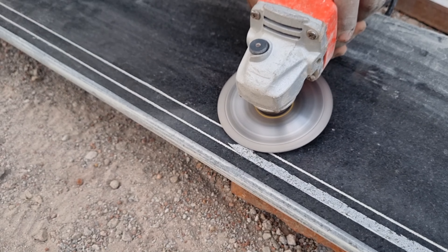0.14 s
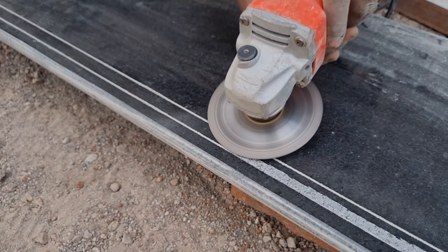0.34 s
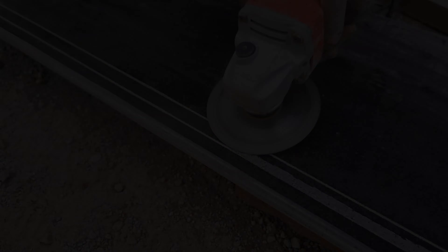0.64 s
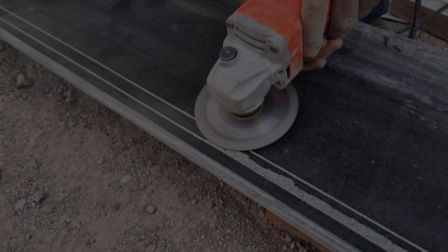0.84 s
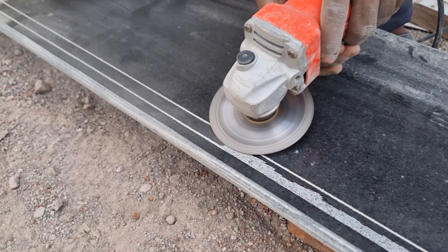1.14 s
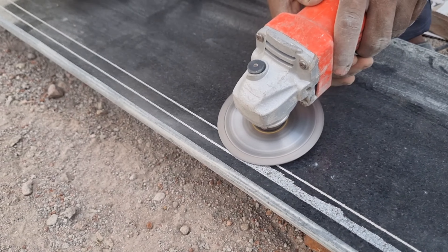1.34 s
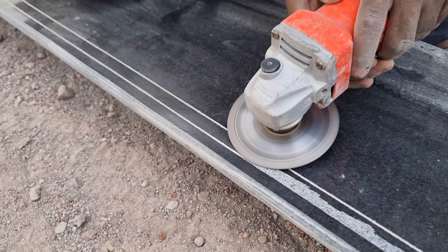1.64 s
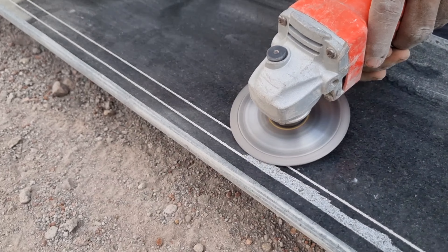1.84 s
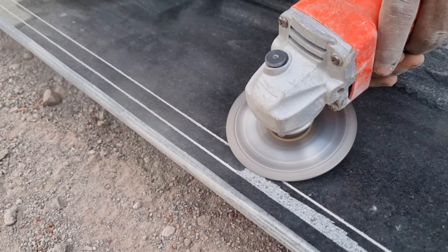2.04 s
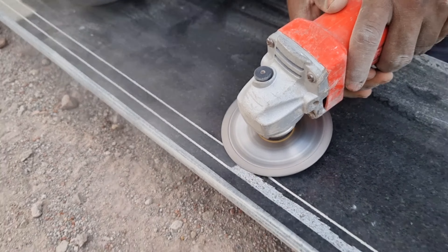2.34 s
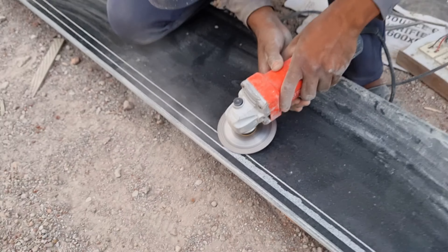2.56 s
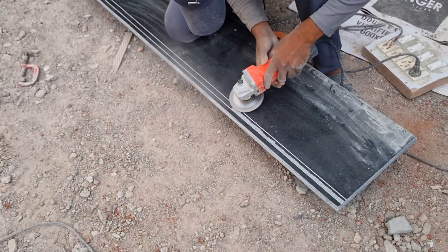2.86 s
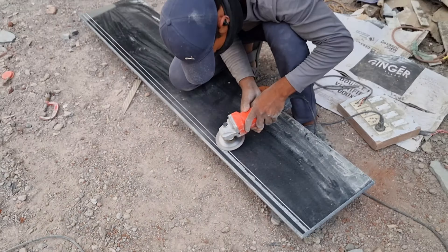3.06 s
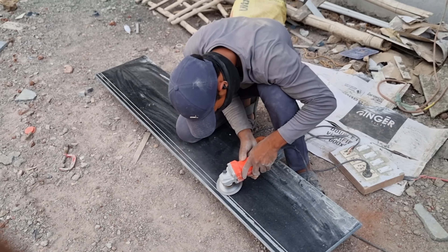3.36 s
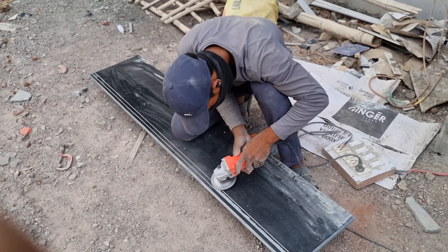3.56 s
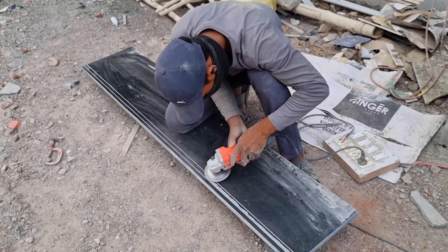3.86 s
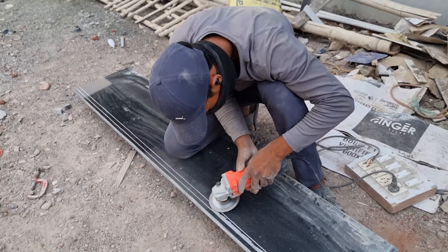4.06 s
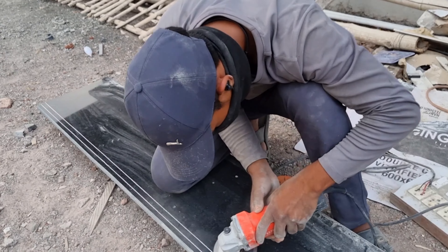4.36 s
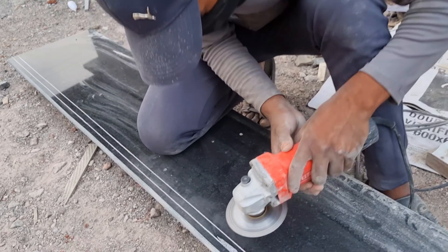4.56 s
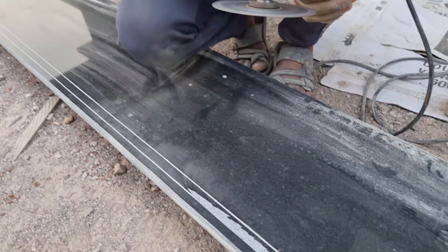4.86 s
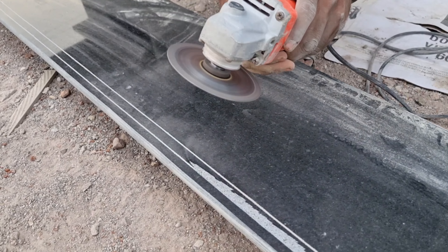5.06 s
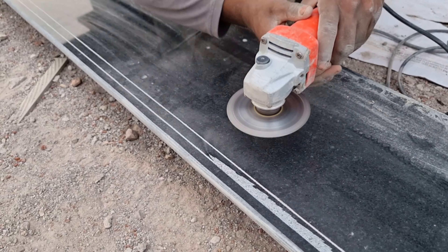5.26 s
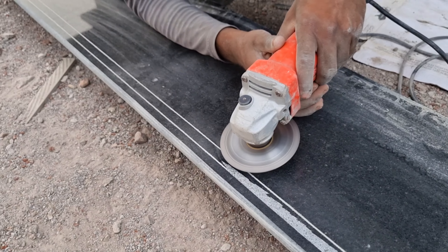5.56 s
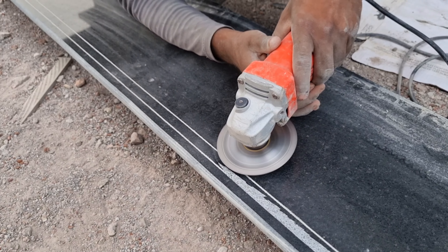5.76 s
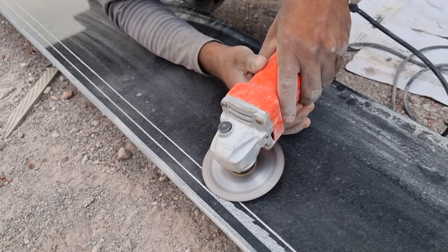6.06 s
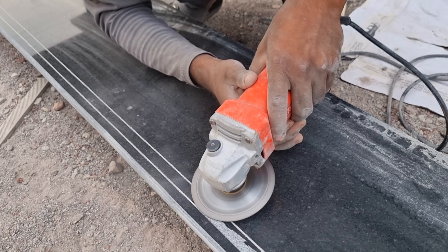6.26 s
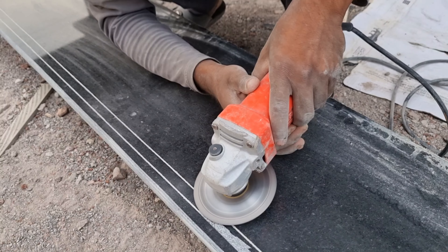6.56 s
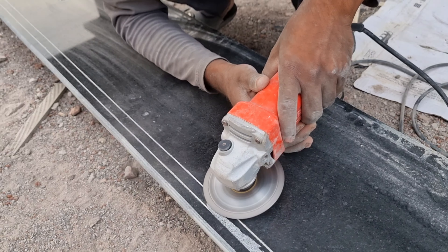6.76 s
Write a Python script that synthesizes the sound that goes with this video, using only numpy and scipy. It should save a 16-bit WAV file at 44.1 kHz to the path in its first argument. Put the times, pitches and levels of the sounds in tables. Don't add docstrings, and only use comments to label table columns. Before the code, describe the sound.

An angle grinder roars harsh and gritty on a stone slab outdoors, its disc ringing metallically, lifting off into free-running whine while wind thumps the microphone.

```python
import sys
import numpy as np
from scipy import signal
from scipy.fft import rfft, irfft, next_fast_len
from scipy.io import wavfile
from scipy.ndimage import uniform_filter1d

SR = 44100
rng = np.random.default_rng(int(sys.argv[2]) if len(sys.argv) > 2 else 0)


def master_out(mix):
    frames = np.transpose(np.atleast_2d(mix))
    ceiling = np.clip(frames, -1, 1)
    pcm = np.round(ceiling * 32767).astype(np.int16)
    wavfile.write(sys.argv[1], SR, pcm)


def to_linear_factor(level_db):
    exponent = np.asarray(level_db, float) / 20
    return 10 ** exponent


N = 304731

# [t/s, speed/turns per s]
SPINDLE_SPEED = [(0, 187), (.6, 186), (1, 184), (2.5, 183), (4.2, 182), (4.5, 184), (4.9, 188), (5.4, 191),
                 (6, 191), (6.91, 188)]
# [t/s, loudness/dB, treble of the disc face/dB, pressure on stone/dB]
TOOL_LEVELS = [(0, -25.5, 6.5, 3.5), (.35, -24.5, 3, -1.5), (.7, -25, -1, 1.5), (1.05, -25, 0.5, 3.5),
               (1.4, -23.5, -2, 0.5), (1.75, -23.5, -2, 0), (2.1, -24, 1, 2.5), (2.72, -26, 1.5, 2.5),
               (2.9, -28.5, 8.5, 2.5), (3.2, -29.5, 6.5, 4.5), (3.45, -29, 9.5, 5), (3.9, -31, 5, 7),
               (4.18, -29.5, 12, 1), (4.3, -31.5, 12, 1.5), (4.42, -30.5, 5.5, -7), (4.5, -31, 2.5, 0),
               (4.8, -27.5, 4, -7), (5.05, -22.5, -8, -1), (5.2, -23.5, 1, 7), (5.75, -24, 1.5, -2),
               (6.05, -20.5, 2, -1), (6.3, -27.5, 9.5, 4.5), (6.6, -27.5, 3.5, 7), (6.75, -27, 4, 3),
               (6.91, -26.5, 6, -3)]
# [middle t/s, length/s, level/dB]
HAND_LEANS = [(0.145, 0.05, -8), (0.242, 0.098, -8), (0.52, 0.21, 4.5), (0.61, 0.071, -9),
              (1.297, 0.15, -3), (1.505, 0.058, 2), (1.778, 0.081, 3.5), (1.934, 0.068, -3),
              (2.465, 0.059, -4.5), (2.555, 0.2, 2), (2.712, 0.047, -4.5), (2.959, 0.034, -4),
              (3.15, 0.054, 2), (3.392, 0.038, 2), (3.793, 0.052, 3.5), (4.236, 0.044, -5),
              (4.272, 0.037, -9), (4.313, .045, -0.5), (4.368, 0.045, -8), (4.41, 0.022, 5),
              (4.456, 0.092, -7.5), (4.828, 0.062, -5.5), (6.55, 0.23, -7.5), (6.782, 0.055, 2.5),
              (6.876, 0.059, -8)]
LEAN_TO_LOUDNESS, LEAN_TO_TREBLE, LEAN_TO_RING = 0.39, 0.57, 0.69
SWELL_EDGE = 4.8
# [from t/s, to t/s]
LIFT_OFFS = [
    (4.435, 6.03),
    (6.434, 6.585),
]
# [f/Hz, level/dB per Hz]
HISS_SPECTRUM = [(88, -18.5), (150, -19), (367, -24), (573, -13.5), (760, -11), (825, -18), (900, -10.5),
                 (995, -13), (1070, -8), (1200, -13.5), (1320, -9.5), (1840, -7.5), (2120, -7), (2560, 0.5),
                 (3250, -0.5), (3390, -2.5), (3520, -2.5), (4350, -3), (4560, -6), (4800, 0), (5600, -6),
                 (6500, -2), (7600, 1), (8710, -3.5), (10500, -1.5), (11450, -2), (12100, 3.5), (13100, 1),
                 (15000, 2.5), (15600, -17)]
DISC_MODE_HZ = [2400, 2850, 3270, 4310, 5110, 6165, 7010, 7290, 8330, 8750, 8975, 10120, 10825, 11200,
                11900, 12360, 13000, 13300, 13600, 13900, 14590, 15400]
# [width/Hz, near level/dB, far level/dB, extra from above/dB, tilt effect/dB per unit]
DISC_MODES = [(58, -22, -82, -15, 17), (57.3, -3.5, -9, -7, -2), (49, -9.5, -9, -3, -1),
              (90, -12.5, -6, 7, 1.5), (39.8, 0.5, -5.5, 0.5, 0), (54.6, 2, -1, -5, 0),
              (110, -9.5, 0, 2, 2), (48, -2.5, 5, 5.5, 2), (70, -14, -14, 6, 2), (54.7, -3.5, -3.5, 0, -3),
              (36.2, 1, -3, -6.5, -2.5), (67, -7.5, -11.5, -7, -5.5), (52.7, -1.5, -8, -8.5, -1.5),
              (45.3, -7, -31, 4, 1), (70, -10, -17, 0, 1), (59, -3.5, -8, 4.5, -2), (90, -9, -25, -19, 5),
              (55.4, -17, -19, -3, -8.5), (44.8, -13, -59, 0, -14), (140, -10, -11, -2, 0),
              (79.6, -0.5, -20, 2, -0.5), (181, -5, -11.5, -19, 1)]
# [t/s, tilt/units]
DISC_TILT = [(0, -1.3), (.5, -0.6), (.9, 0.8), (1.1, -1.3), (1.5, -1.2), (1.9, -0.7), (2.3, 1.42),
             (2.5, -1), (2.9, -2), (3.1, 0.5), (3.5, 1.8), (3.9, 1.3), (4.1, -1.5), (4.3, -0.5),
             (6.1, -0.1), (6.3, -0.2), (6.91, -1.6)]
RING_SHARED, RING_DIFFERING = 0.94, 0.44
# [t/s, share taken out/0-1]
MUTE_SHARE = [(0, 0), (2.15, 0), (2.27, .8), (2.4, 0), (2.95, .1), (3.22, .7), (3.25, 1), (3.42, 1),
              (3.55, .8), (3.7, 1), (3.92, 1), (4.0, .55), (4.25, .5), (4.3, .8), (4.36, .6), (4.5, 0),
              (6.91, 0)]
MUTE_BAND_HZ = [9130, 9780]
# [t/s, level/dB]
SLAB_RING = [(0, 0), (.15, -3), (1, -13), (2, -17), (2.4, -0.5), (2.9, -1), (3.25, -17), (3.4, -25),
             (3.9, -30), (4.08, -0.5), (4.22, 3), (4.3, -18), (5, -4.5), (5.9, -15), (6.1, -36.5),
             (6.91, -27)]
SLAB_HZ, SLAB_WIDTH_HZ = 2780, 800
# [middle t/s, length/s, level/dB]
COOLING_JETS = [
    (4.19, 0.15, 1),
    (5.027, 0.26, 6),
]
JET_HZ, JET_WIDTH_HZ = 12800, 3000

HUM_ORDERS = [1, 3, 4, 5]
GEAR_TEETH_ORDERS = [9, 10, 11, 13, 15]
# [t/s, level/dB]
SLAB_SHAKE = [(0, -55.5), (.9, -37.5), (2.45, -36), (3.0, -36.5), (3.3, -38), (3.6, -40.5), (3.9, -44),
              (4.25, -59), (5.1, -51), (5.3, -54), (6.91, -43)]
# [t/s, level/dB]
SWEEP_JOLTS = [(0.052, 14.5), (.41, 17), (.75, 8), (.91, 8.5), (1.2, 11.5), (1.48, 12), (1.76, 10),
               (1.9, 3), (2.059, 10), (2.34, 12), (2.6, 4.5), (2.76, 4.5), (3.02, 5.5), (3.18, 7),
               (3.35, 6), (3.55, 4), (3.72, -0.5)]
SWEEP_RISE_S, SWEEP_FALL_S = 0.0079, 0.18
FIFTH_DB, FIFTH_FOLLOWS, FIFTH_DB_PER_HALVING = -38, 0.61, -12.5
THIRD_DB, THIRD_DB_PER_TURN = -62.5, 4.5
HOUSING_DB, HOUSING_FOLLOWS = -36, 1.38
# [middle t/s, length/s, level/dB]
RIM_CATCHES = [
    (0.05, 0.18, -29),
    (0.315, 0.082, -30.5),
    (0.437, 0.14, -26.5),
    (2.947, .2, -39.5),
    (3.346, 0.27, -35),
    (3.76, 0.63, -34),
    (4.262, 0.29, -37.5),
    (6.092, 0.14, -28),
    (6.345, 0.19, -26),
    (6.756, 0.34, -32.5),
]
CATCH_REST_DB = -48
# [t/s, f/Hz, level/dB]
COMMUTATOR_WHINE = [(4.35, 12380, -75), (4.5, 12450, -45), (4.8, 12680, -39), (5.1, 12830, -36),
                    (5.3, 12880, -45), (5.9, 12900, -52), (6.1, 12900, -75)]

# [t/s, delay/s]
ECHO_DELAY = [(0, .0028), (2.3, .0026), (2.6, .0017), (2.8, .0010), (3.05, .00052), (3.22, .00036),
              (3.36, .0002), (3.8, .0002), (3.95, .00036), (4.06, .00052), (4.25, .00054), (4.6, .0010),
              (5.1, .0022), (6.91, .0022)]
# [middle t/s, length/s, share/0-1]
STEP_BOUNCE = (4.14, 0.095, 0.81)
# [t/s, turned away/0-1, treble left-right/dB, extra left lead/s, echo share/0-1]
MIC_STANCE = [(0, 0.43, -5, .00001, 0.23), (.7, 0.26, -6, 0, 0.01), (2.3, 0.24, 2.5, 0, 0.1),
              (2.6, 0.3, -7, 0, 0.12), (2.9, 0.49, -11, 0, 0.2), (3.2, 0.89, 2, 0, 0.53),
              (3.55, 0.82, 0, 0, 0.14), (3.85, 1, 6, 0, 0.5), (4.1, 0.63, -10, 0, 0.63),
              (4.22, 0.37, -16, 0, 0.23), (4.3, 0.16, -14, 0, 0), (5.15, 0.19, -13.5, 0, 0),
              (5.3, 0.14, -3, 0, 0), (5.95, 0.21, -3, 0, 0.07), (6.1, 0.17, -8, -.000005, 0.2),
              (6.91, 0.17, -6.5, -.000005, 0.22)]
# [f/Hz, left minus right/dB]
FACING_SHADE = [(300, -1.5), (1400, 1), (2500, -3), (3100, -7), (3600, 3.5), (4500, 6), (5200, 16.5),
                (5800, 15), (6400, 18.5), (7200, 10), (8200, 10), (8900, -19), (9600, -15), (10300, -7),
                (11000, 13), (12000, 9.5), (14000, 5.5)]
# [f/Hz, left minus right/dB]
TURNED_SHADE = [(300, 3.5), (1400, -0.5), (2600, -6), (3300, -6), (3800, -0.5), (4600, -12), (6000, -15.5),
                (8000, -13), (9500, -2.5), (12000, -14), (15000, -11.5)]
# [f/Hz, left minus right/dB]
ABOVE_SHADE = [(2300, -1), (2800, 1), (3300, 5.5), (4300, 0.5), (5100, -0.5), (7200, 0), (8800, 5),
               (9600, 24), (10500, -8.5), (14500, 0.5)]
ABOVE_FROM_S, ABOVE_RISE_S = 4.57, 0.33
# [f/Hz, phase/rad]
FACING_LEAD = [(0, 0), (2050, .2), (2700, 2.8), (3350, 3.5), (4600, 9.4), (5100, 9.6), (6200, 15.7),
               (6600, 16.8), (7500, 18.3), (9000, 18.9), (10000, 20.5), (13000, 21), (16400, 22)]
# [f/Hz, phase/rad]
TURNED_LEAD = [(0, 0), (2200, 0), (2900, 2), (3150, 2.9), (3420, 3.4), (3650, 6.2), (4500, 6.6),
               (5100, 8.2), (5600, 6.4), (7200, 7.6), (8600, 7.4), (9300, 3.5), (10300, 4.8), (14000, 6.3),
               (16400, 6.3)]
# [f/Hz, likeness/0-1]
PORT_LIKENESS = [(300, 0.75), (700, 1), (1300, 0.88), (1900, 0.54), (2600, 0.56), (3200, 0.35),
                 (3800, 0.21), (6000, 0.32), (9000, 0.26), (15000, 0.23)]
# [t/s, share/-1 to 1]
CLEAR_PATH = [(2.2, 0), (2.3, .9), (2.4, -.3), (3.25, -.3), (3.36, .8), (3.82, .8), (3.9, -.5), (4.4, -.6),
              (5.3, 0), (5.9, .15), (6.12, .5), (6.16, .99), (6.43, .99), (6.47, 0), (6.6, 0), (6.64, .6),
              (6.91, .65)]

# [t/s, level/dB]
BREEZE_LEVEL = [(0, -69), (.45, -73), (.85, -55), (1.3, -70), (1.6, -53), (2.0, -58), (2.6, -56.5),
                (3.3, -50), (4.2, -53.5), (4.35, -57), (4.78, -68), (5.25, -48.5), (5.8, -46), (6.1, -39),
                (6.91, -47.5)]
BREEZE_BRIGHT_DB = -7
# [start t/s, hold/s, level/dB, brightness/dB]
GUST_HITS = [(0.06, 0.028, -50.5, -16), (0.157, 0.06, -49, -28), (1.105, 0.0096, -49, -22),
             (1.848, 0.016, -45, 7), (2.396, 0.018, -54, -15), (2.74, 0.1, -50, -8),
             (3.022, 0.071, -37, -13), (3.505, 0.018, -50, -15), (3.62, 0.062, -43, 0.5),
             (3.77, 0.096, -47.5, -5), (3.925, 0.091, -50, -24), (4.064, 0.13, -42, -4.5),
             (4.504, 0.051, -47, -17), (4.633, 0.026, -49, -18), (4.829, 0.12, -21.5, -4.5),
             (5.007, 0.049, -22.5, -6), (5.068, 0.027, -33, 4), (5.112, 0.039, -31.5, 11.5),
             (5.2, 0.018, -38, 0), (5.43, 0.037, -41, -3), (5.507, 0.021, -36.5, -3.5),
             (5.61, 0.015, -38, -33), (5.86, 0.056, -40, 3), (5.913, 0.032, -26.5, 1),
             (6.017, 0.049, -50, 15), (6.126, 0.057, -35.5, 3), (6.22, 0.032, -39, 3),
             (6.41, 0.076, -40, 1.5), (6.595, 0.017, -49, -7), (6.678, 0.022, -39, -4),
             (6.736, 0.0099, -42, 5), (6.806, 0.018, -40, 2), (6.871, 0.012, -36, 0)]
GUST_RISE_DB_PER_S, GUST_FALL_DB_PER_S = 1500, 332
# [f/Hz, level/dB per Hz]
RUMBLE_SPECTRUM = [(12, -30), (25, 5), (45, 4), (75, 6), (110, 1), (150, -7), (220, -9), (400, -47.5)]
# [f/Hz, level/dB per Hz]
FLUTTER_SPECTRUM = [(110, -20), (160, -3), (220, -3.5), (350, -5.5), (500, -13), (800, -16), (1600, -51)]
# [t/s, level/dB, f/Hz, direction]
EDDY_THUDS = [(1.852, -20, 190, 1), (1.868, -20, 70, -1), (2.766, -29, 150, 1), (3.029, -34, 110, 0.82),
              (3.619, -29, 140, 1), (4.841, -5, 83, 1), (4.878, -10, 257, -1), (5.021, -11, 90, -0.88),
              (5.046, -3.5, 110, 1), (5.521, -19, 130, 1), (5.915, -12, 90, -1), (5.947, -8.5, 90, -1),
              (5.998, -13.5, 179, 1), (6.155, -27, 220, 0.89), (6.468, -20, 120, -1),
              (6.70, -21, 179, -1.1), (6.749, -14, 226, 0.89), (6.88, -19, 120, -1)]
FRAME_HZ, CUTOFF_HZ = 46.875, 15760


def rms_one(x):
    return x / np.sqrt(np.mean(x ** 2) + 1e-20)


def in_time(rows, t=None):
    s, *columns = np.transpose(rows)
    t = np.arange(N) / SR if t is None else t
    return [np.interp(t, s, column) for column in columns]


def at_hz(points, hz):
    f, level = np.array(points).T
    return np.interp(np.log(hz + 1), np.log(f), level)


def bump(middle, length):
    return np.exp(-abs(2 * (np.arange(N) / SR - middle) / length) ** SWELL_EDGE)


def drift(rate):
    r = np.exp(-80 * np.pi * rate / SR)
    slow = signal.lfilter([1], [1, -2 * r, r * r], rng.standard_normal(N // 40 + 2002))[2000:]
    return np.interp(np.arange(N) / 40, np.arange(len(slow)), rms_one(slow))


def coloured(points, channels, ripple_db=0.):
    size = next_fast_len(N)
    hz = np.fft.rfftfreq(size, 1 / SR)
    ripple = np.interp(hz, np.arange(600) * 45, rng.standard_normal(600))
    gain = to_linear_factor(at_hz(points, hz) + ripple_db * ripple)
    noise = rng.standard_normal((channels, size))
    return rms_one(irfft(rfft(noise) * gain, size)[:, :N])


def resonance(x, hz, width_hz):
    r = np.exp(-np.pi * width_hz / SR)
    return rms_one(signal.lfilter([1, 0, -1], [1, -2 * r * np.cos(2 * np.pi * hz / SR), r * r], x))


def passed(x, order, hz, kind="low"):
    return signal.sosfilt(signal.butter(order, hz, kind, fs=SR, output="sos"), x)


def passed_in_phase(x, order, hz, kind="low"):
    return signal.sosfiltfilt(signal.butter(order, hz, kind, fs=SR, output="sos"), x)


def above(t):
    return np.clip((t - ABOVE_FROM_S) / ABOVE_RISE_S, 0, 1)


def spin():
    return 2 * np.pi * np.cumsum(in_time(SPINDLE_SPEED)[0]) / SR


def grinder(idle_db, ring_db, wobble, chatter_db, wander_db):
    hiss_db, bright_db, disc_db = cutting()
    t = np.arange(N) / SR
    touching = uniform_filter1d(1. - sum((t > a) & (t < b) for a, b in LIFT_OFFS), size=600)
    bite = touching * np.sqrt(np.clip(to_linear_factor(disc_db) ** 2 - to_linear_factor(idle_db) ** 2, .2, None))
    pressing = np.clip(4.7 * bite, 0, 1)
    chatter = to_linear_factor(chatter_db * pressing * (drift(25.0) + 0.17 * drift(35.)))
    rim = (1 + wobble * pressing * np.cos(spin())) * chatter
    white = rng.standard_normal((2, N)) * [[1], [RING_DIFFERING / RING_SHARED]]
    body = grit_hiss(rim, bright_db - 0.95 * pressing) + slab(white) + cooling_jet()
    ring = RING_SHARED * to_linear_factor(ring_db) * bite * disc_ring(white, rim, bright_db, wander_db)
    tool = to_linear_factor(hiss_db + 0.78 * pressing * drift(0.91)) * (body + ring)
    return tool - in_time(MUTE_SHARE)[0] * passed_in_phase(tool, 3, MUTE_BAND_HZ, "band")


def cutting():
    loud_db, face_db, press_db = in_time(TOOL_LEVELS)
    lean_db = sum(db * bump(s, length) for s, length, db in HAND_LEANS)
    loud_db = loud_db + LEAN_TO_LOUDNESS * lean_db
    return loud_db, face_db + LEAN_TO_TREBLE * lean_db, press_db + LEAN_TO_RING * lean_db


def grit_hiss(rim, treble_db):
    noise = coloured(HISS_SPECTRUM[:-1], channels=2, ripple_db=1.2)
    low = rms_one(passed(noise, 4, 7500))
    high = rms_one(passed(noise, 4, 7500, "high"))
    return 1.27 * low * rim ** 0.53 + 1.03 * high * rim * to_linear_factor(treble_db)


def disc_ring(white, rim, bright_db, wander_db):
    height = above(np.arange(N) / SR)
    far, tilt = np.clip(in_time(MIC_STANCE)[0], 0, 1), in_time(DISC_TILT)[0]
    modes = []
    for hz, (width, near_db, far_db, above_db, tilt_db) in zip(DISC_MODE_HZ, DISC_MODES):
        level_db = near_db + far * (far_db - near_db) + height * above_db + tilt * tilt_db
        level = to_linear_factor(level_db + wander_db * drift(2.5)) * np.sqrt(width / 50)
        grains = np.roll(white, hz, axis=1) * rim
        modes.append(level * resonance(grains, hz, width))
    return sum(modes[:11]) + sum(modes[11:]) * to_linear_factor(0.31 * bright_db - 1.5 * height)


def slab(white):
    once = resonance(white, SLAB_HZ, SLAB_WIDTH_HZ)
    return to_linear_factor(in_time(SLAB_RING)[0]) * resonance(once, SLAB_HZ, SLAB_WIDTH_HZ)


def cooling_jet():
    swing = sum(to_linear_factor(db) * bump(s, length) for s, length, db in COOLING_JETS)
    return swing * resonance(rng.standard_normal((2, N)), JET_HZ, JET_WIDTH_HZ)


def hum():
    fourth_db, fifth_db, mode_db, third_db, housing_db = hum_levels()
    angle, white = spin() + 0.26 * drift(7.2), rng.standard_normal((2, N))
    first, third, fourth, fifth = (rms_one(to_linear_factor(2.4 * drift(22.0)) * np.cos(k * angle)) for k in HUM_ORDERS)
    tones = to_linear_factor(fourth_db - 3.5) * (fourth + to_linear_factor(-20.5) * first)
    tones = tones + to_linear_factor(fifth_db - 5.5) * fifth + to_linear_factor(third_db - 17.5) * third
    lowest_mode = to_linear_factor(mode_db - 3.5) * resonance(white, 1138, 16.0)
    housing = to_linear_factor(housing_db - 8.0) * resonance(white[::-1], 1308, 47)
    mostly_shared = (tones + gears(angle)) * [[1], [.55]]
    return mostly_shared + lowest_mode + housing + commutator() * [[1], [0]]


def hum_levels():
    t = np.arange(N) / SR
    load_db, loud_db = in_time(SLAB_SHAKE)[0], in_time(TOOL_LEVELS)[0]
    sweep_db = -5.5
    for s, db in SWEEP_JOLTS:
        rise, fall = np.clip(s - t, 0, 1) / SWEEP_RISE_S, np.clip(t - s, 0, 9) / SWEEP_FALL_S
        sweep_db = sweep_db + db * np.exp(-fall ** 2 - rise ** 2)
    halvings = np.log2(ECHO_DELAY[0][1] / in_time(ECHO_DELAY)[0])
    fifth_db = FIFTH_DB + FIFTH_FOLLOWS * (load_db + 39) + 0.39 * sweep_db
    fifth_db = fifth_db + FIFTH_DB_PER_HALVING * np.minimum(halvings, 2.2)
    third_db = THIRD_DB + THIRD_DB_PER_TURN * (in_time(SPINDLE_SPEED)[0] - 183)
    third_db = third_db + 3.1 * (loud_db + 22) + 31.0 * (bump(0.061, 0.18) + bump(0.49, 0.29))
    mode_db = CATCH_REST_DB + sum((db - CATCH_REST_DB) * bump(s, length) for s, length, db in RIM_CATCHES)
    housing_db = HOUSING_DB + HOUSING_FOLLOWS * (loud_db + 28)
    return load_db + sweep_db, fifth_db, mode_db, third_db, housing_db


def gears(angle):
    teeth = sum(to_linear_factor(3.0 * drift(6.3)) * np.cos(k * angle + k * k) for k in GEAR_TEETH_ORDERS)
    return to_linear_factor(cutting()[0] - 24.5) * teeth


def commutator():
    hz, level_db = in_time(COMMUTATOR_WHINE)
    phase = 2 * np.pi * np.cumsum(hz + 35 * drift(40.0)) / SR
    return to_linear_factor(level_db + 6.5 + 2.5 * drift(9.0)) * np.cos(phase)


def ground(x):
    n, delay, share = np.arange(N), in_time(ECHO_DELAY)[0] * SR, in_time(MIC_STANCE)[3]
    dull = passed_in_phase(x, 2, 4500)
    once, twice = (np.array([np.interp(n - k * delay, n, c) for c in dull]) for k in (1, 2))
    middle, length, step_share = STEP_BOUNCE
    return x + share * once + step_share * bump(middle, length) * twice


def ports(x):
    hz, t, (shared, differing) = signal.stft(x, SR, nperseg=512)
    turned, treble_db, lead = in_time(MIC_STANCE, t)[:3]
    turned, col = np.clip(turned, 0, 1), hz[:, None]
    shade_db = at_hz(FACING_SHADE, col) * (1 - turned) + at_hz(TURNED_SHADE, col) * turned
    shade_db = shade_db + at_hz(ABOVE_SHADE, col) * above(t) + treble_db / (1 + (10000 / (col + 1)) ** 8)
    shade = to_linear_factor(shade_db / 2)
    alike = np.clip(at_hz(PORT_LIKENESS, col) + 0.0082 * turned, 0, .98)
    clear = in_time(CLEAR_PATH, t)[0] * np.exp(-((col - 3050) / 900) ** 2)
    alike = alike + (1 - alike) * clear
    lead = lead + 8e-6 * np.interp(t * SR, np.arange(N), drift(2.6))
    p, q = np.sqrt((1 + alike) / 2) * shared, np.sqrt((1 - alike) / 2) * differing
    facing, away = (np.exp(1j * np.interp(col, *np.transpose(rows))) for rows in (FACING_LEAD, TURNED_LEAD))
    blend = facing * (1 - turned) + away * turned
    early = blend / (abs(blend) + 1e-9) * np.exp(2j * np.pi * col * lead)
    even = np.sqrt(2 / (shade ** 2 + shade ** -2))
    pair = np.array([shade * early * (p + q), (p - q) / shade]) * even
    return signal.istft(pair, SR, nperseg=512)[1][:, :N]


def wind(lumpy_db, right_db):
    rumble, flutter = gusting()
    lumps = rms_one(to_linear_factor(lumpy_db * drift(24.0)))
    deep = coloured(RUMBLE_SPECTRUM, channels=2)
    deep = rms_one(deep / np.sqrt(0.2 + uniform_filter1d(deep ** 2, size=1500)))
    air = rumble * deep + flutter * to_linear_factor(-8.5) * lumps * coloured(FLUTTER_SPECTRUM, channels=2)
    pushes = (to_linear_factor(9.0) * lumps * air + thuds()) * to_linear_factor([[0], [right_db]])
    return passed(pushes, 2, 35, "high")


def gusting():
    t = np.arange(N) / SR
    rumble = to_linear_factor(in_time(BREEZE_LEVEL)[0])
    flutter = rumble * to_linear_factor(BREEZE_BRIGHT_DB)
    for s, hold, db, bright_db in GUST_HITS:
        rise_db = GUST_RISE_DB_PER_S * np.clip(s - t, 0, 1)
        fall_db = GUST_FALL_DB_PER_S * np.clip(t - s - hold, 0, 1)
        gust = to_linear_factor(db - rise_db - fall_db)
        rumble, flutter = rumble + gust, flutter + gust * to_linear_factor(bright_db)
    return rumble, flutter


def thuds():
    t, total = np.arange(N) / SR, 0
    for s, db, hz, direction in EDDY_THUDS:
        u = np.clip(np.pi * hz * (t - s), -6, 6) ** 2
        total = total + direction * to_linear_factor(db) * (1 - 2 * u) * np.exp(-u)
    return total


def handset_thinning(x, hole_db, thin_db, hidden_db):
    size = 2 * round(SR / FRAME_HZ)
    hz, t, z = signal.stft(x, SR, "cosine", size)
    power, col = abs(z) ** 2, hz[:, None]
    band = uniform_filter1d(power, size=6, axis=1)
    masker = uniform_filter1d(power.mean(0), size=110, axis=0)
    heard = (band > masker * to_linear_factor(hole_db) ** 2) | (col < 2300)
    keep = heard & (power > band * to_linear_factor(thin_db) ** 2)
    left, right = z * (keep | (col < 600)) * (col < CUTOFF_HZ)
    mid, side = left + right, left - right
    mid_power, side_power = (uniform_filter1d(abs(part) ** 2, size=9, axis=0) for part in (mid, side))
    mid = mid * (mid_power > to_linear_factor(hidden_db) ** 2 * side_power)
    return signal.istft(np.array([mid + side, mid - side]) / 2, SR, "cosine", size)[1][:, :N]


def scene():
    tool = grinder(idle_db=-5.5, ring_db=-3.0, wobble=0.06, chatter_db=1.42, wander_db=1.17) + hum()
    return ports(ground(tool)) + wind(lumpy_db=2.0, right_db=-31.5)


def low_pass(x):
    return signal.sosfilt(signal.butter(12, 15800, fs=SR, output="sos"), x)


def record(dry):
    treble = passed(dry, 2, 3000, "high")
    x = dry + 0.14 * treble * np.cos(2 * np.pi * FRAME_HZ * np.arange(N) / SR)
    rounded = 1.2 * np.tanh(x / 1.2)
    mix = handset_thinning(rounded, hole_db=-6.5, thin_db=-5, hidden_db=-6)
    return low_pass(mix)


dry = scene()
out = record(dry)
master_out(out)
```